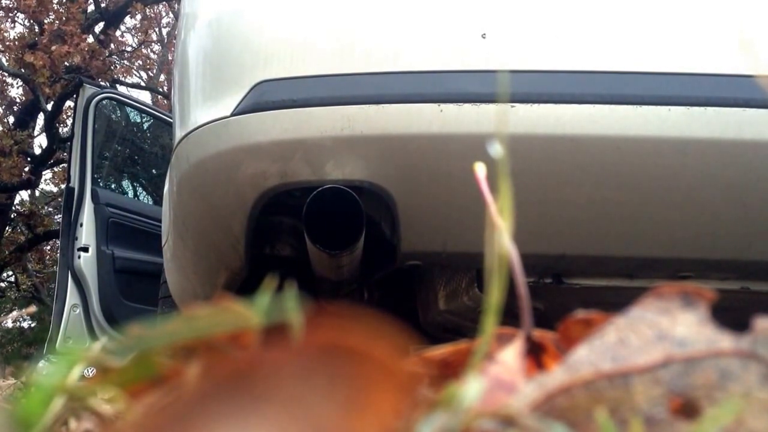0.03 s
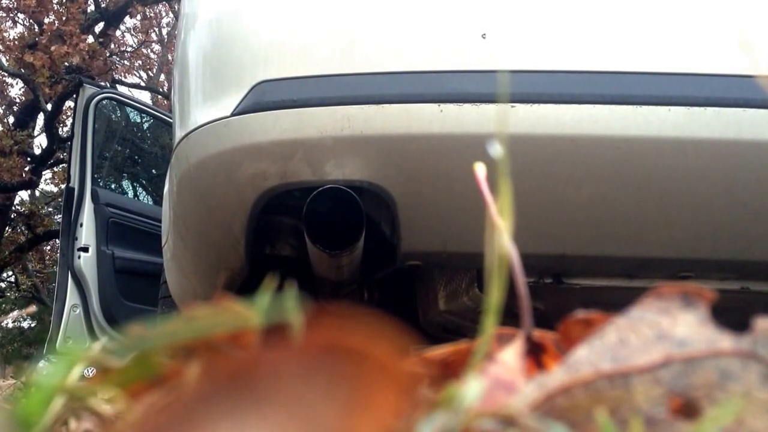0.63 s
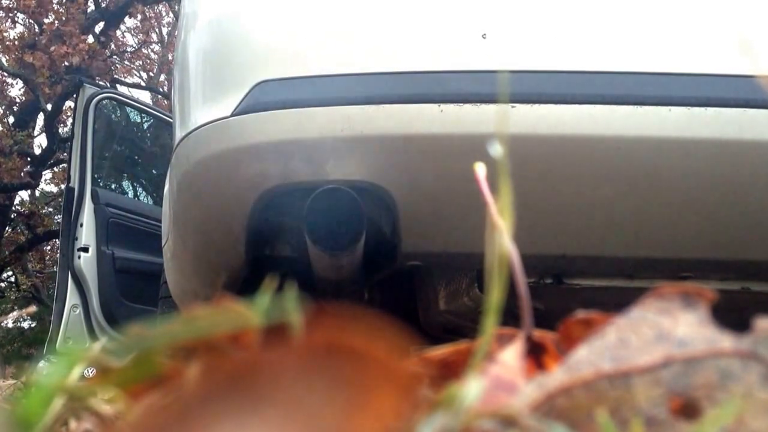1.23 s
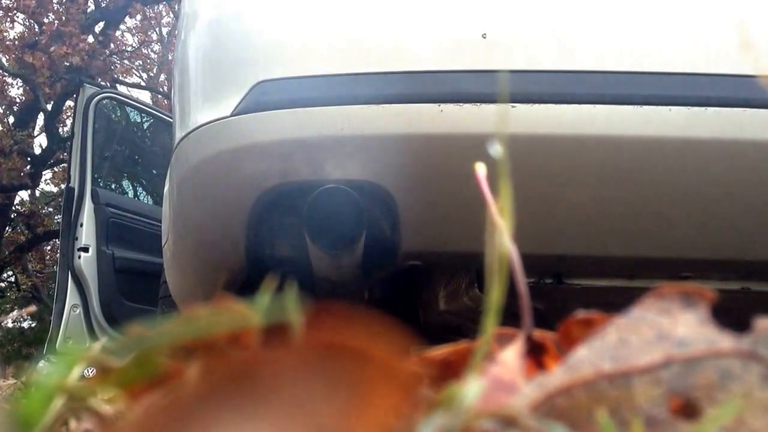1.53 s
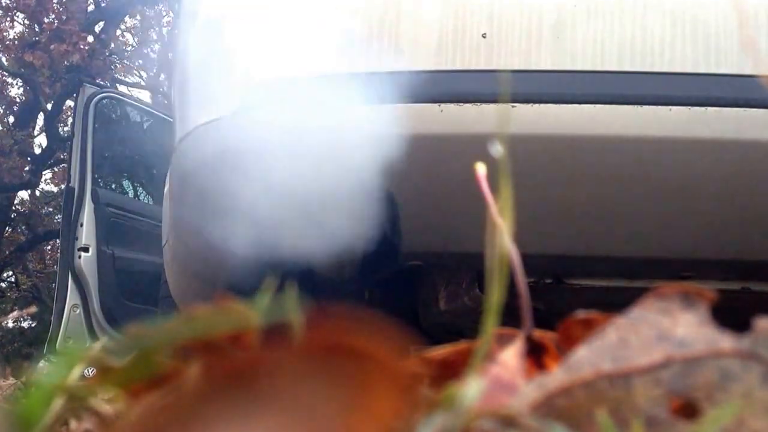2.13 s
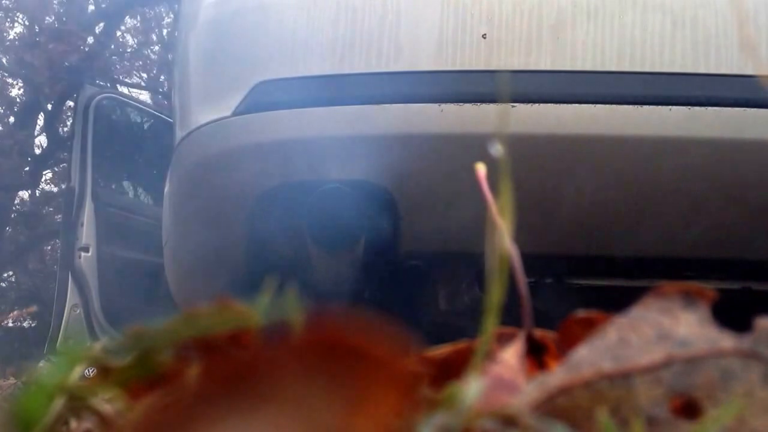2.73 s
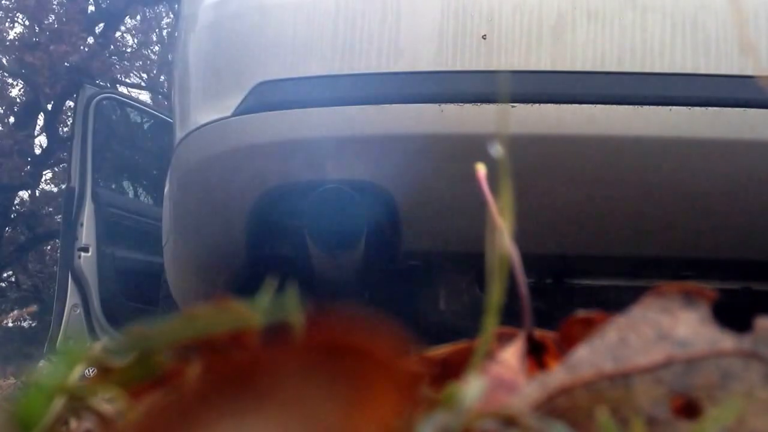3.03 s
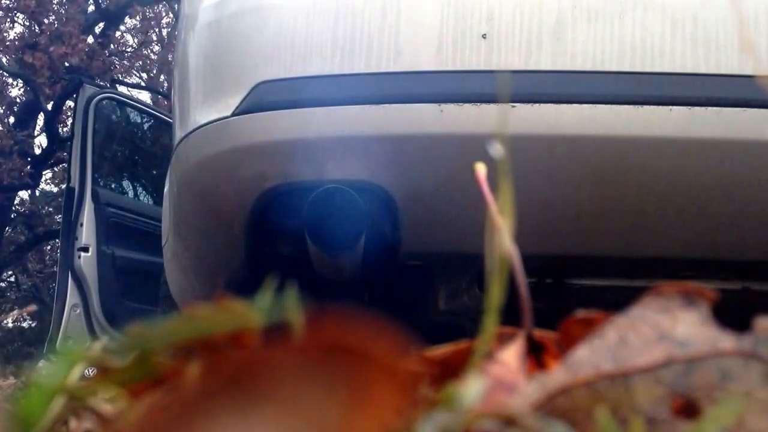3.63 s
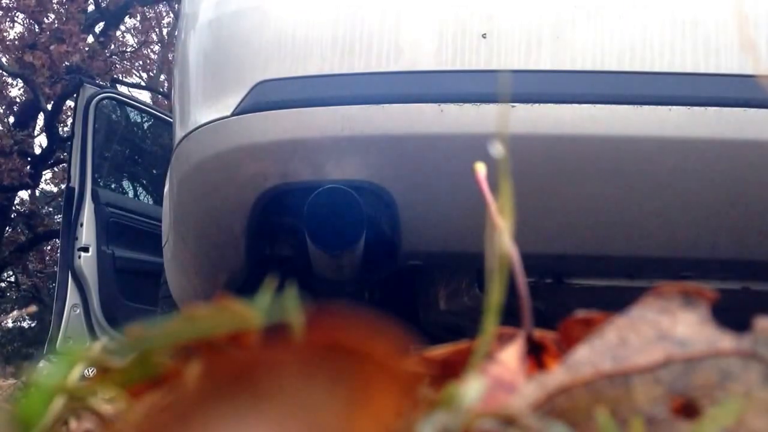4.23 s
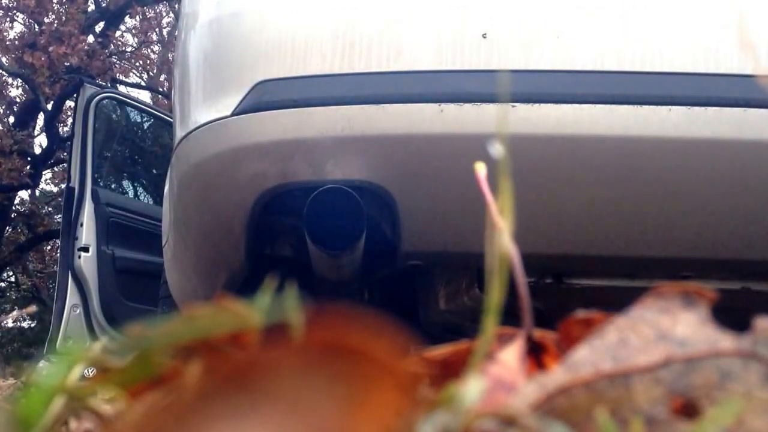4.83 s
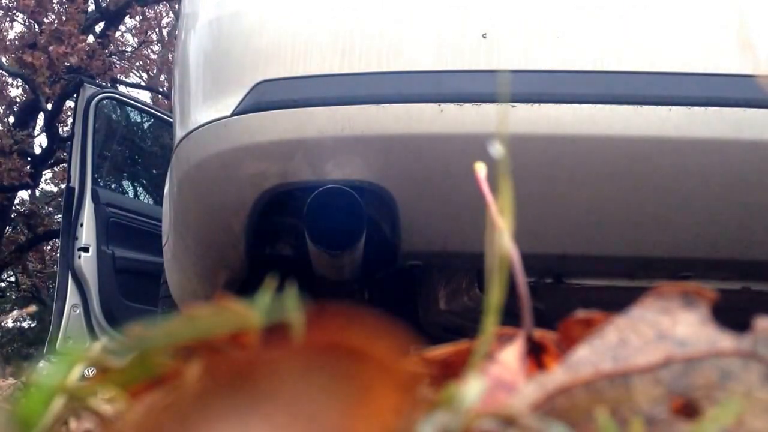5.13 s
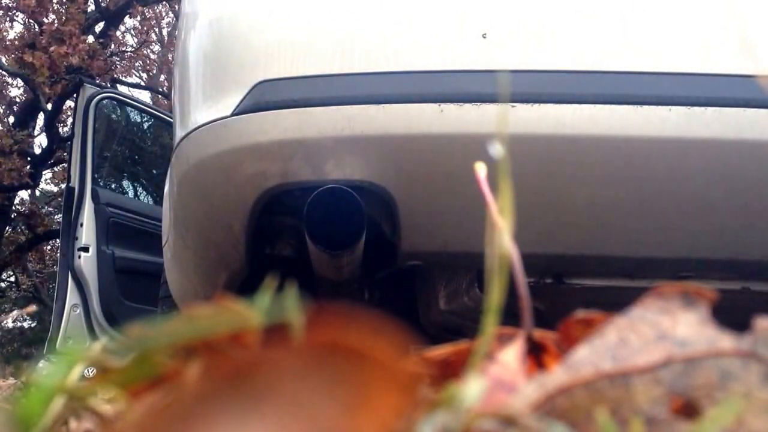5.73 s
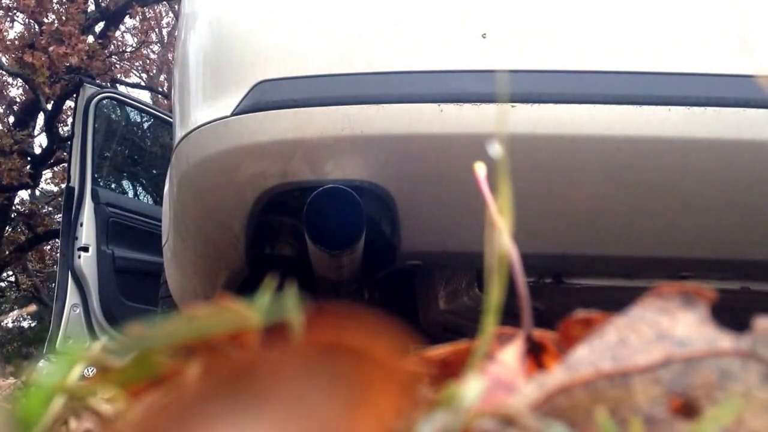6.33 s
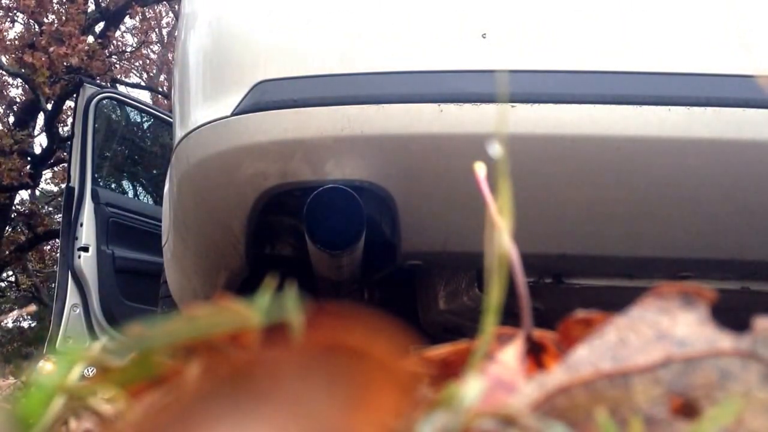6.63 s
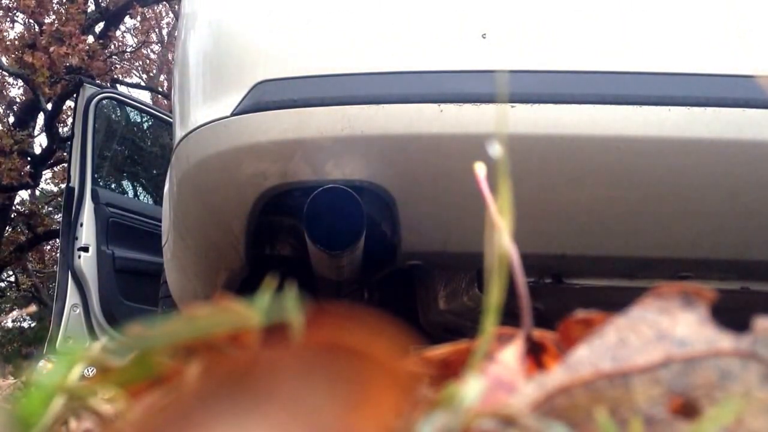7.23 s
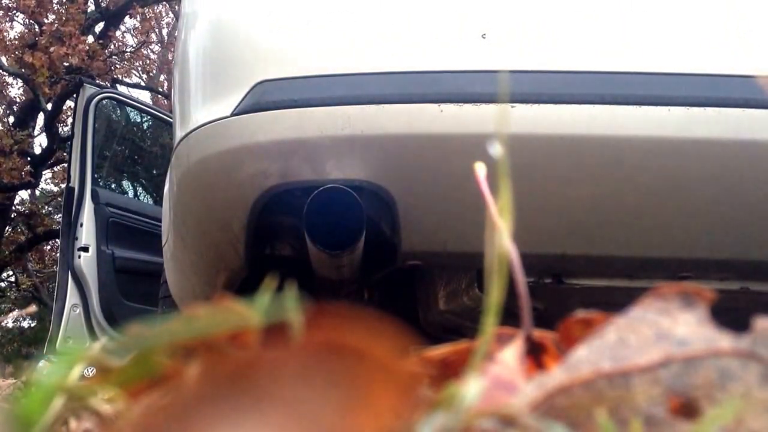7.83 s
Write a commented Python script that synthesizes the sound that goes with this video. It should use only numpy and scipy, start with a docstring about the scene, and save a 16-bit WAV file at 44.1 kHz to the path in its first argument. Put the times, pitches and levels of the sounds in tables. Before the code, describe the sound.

Heard close to the tailpipe, a cold diesel car cranks, fires up and idles roughly, ending with a touch of throttle.

```python
"""First come two soft knocks, then the whine of a starter cranking a cold four-cylinder diesel car.
A few hard firings bark, the engine catches and sinks to a lumpy idle, and a faint turbo whistle creeps in.
At the end the throttle is touched. We listen outdoors, from the ground just behind the tailpipe.
Each firing rings the exhaust, pushes out a gust of swirling gas and hisses at the end of the pipe."""
import sys
import numpy as np
from scipy import signal
from scipy.fft import rfft, irfft
from scipy.io import wavfile
from scipy.ndimage import uniform_filter1d, minimum_filter1d

SR = 44100
rng = np.random.default_rng(int(sys.argv[2]) if len(sys.argv) > 2 else 0)


def to_wav(sig):
    """Store sig (one row per channel, or 1-D mono) as 16-bit WAV at the path in sys.argv[1].

    Samples outside -1..1 are clipped; the rate is SR.
    """
    pcm = np.clip(np.atleast_2d(sig), -1, 1) * 32767
    pcm = np.round(pcm).astype(np.int16)
    wavfile.write(sys.argv[1], SR, pcm.T)  # frames by channels


N = 347508
TIME = np.arange(N) / SR
FREQ = np.fft.rfftfreq(2 ** 19, 1 / SR) + 1e-3
CATCH_S, WARM_UP_S = 1.352, 5.33  # the engine runs by itself; it is mostly warm
THROTTLE_S, REV_RISE_S = 7.695, .12  # the throttle is touched; how long speeding up takes


def undb(db):
    """Turn decibels into a gain to multiply by."""
    return 10 ** (np.asarray(db) / 20)


def unit(x):
    """Scale a sound to an average (rms) size of 1."""
    return x / np.sqrt(np.mean(x ** 2))


def noise():
    """White noise."""
    return rng.standard_normal(N)


def walk(rate_hz):
    """A random wander of about size 1, gliding to a new value rate_hz times a second."""
    step = int(SR / rate_hz)
    levels = np.repeat(rng.standard_normal(N // step + 1), step)[:N]
    return unit(uniform_filter1d(levels, step))


def ramp(t, start, length):
    """0 before the start, rising evenly to 1 over the length."""
    return np.clip((t - start) / length, 0, 1)


def span(start, end, fade):
    """1 between start and end, fading in and out."""
    return np.clip(np.minimum(TIME - start, end - TIME) / fade, 0, 1)


def swells(times, sizes, width):
    """A bell-shaped swell around each time."""
    return sum(size * np.exp(-((TIME - s) / width) ** 2) for s, size in zip(times, sizes))


def pulses(times, sizes):
    """One click at each time."""
    return np.bincount(np.clip(times * SR, 0, N).astype(int), sizes, N + 1)[:N]


def gusts(times, sizes, rise_s):
    """A swell after each time that peaks after rise_s and dies away."""
    age = TIME[:SR // 4] / rise_s
    return signal.fftconvolve(pulses(times, sizes), age * np.exp(1 - age))[:N]


def through(x, response):
    """Filter a sound; the response gives a gain for every frequency."""
    return irfft(rfft(x, 2 * (len(FREQ) - 1)) * response)[:N]


def band(x, low_hz, high_hz, order=3):
    """Keep what lies between two frequencies."""
    sections = signal.butter(order, [low_hz, high_hz], "band", fs=SR, output="sos")
    return signal.sosfilt(sections, x + 1e-18)


def colour(points):
    """A filter that follows (Hz, dB) points and falls away steeply beyond them."""
    hz, db = np.transpose(points)
    octaves_outside = np.abs(np.log2(FREQ / np.clip(FREQ, hz[0], hz[-1])))
    curve_db = np.interp(np.log(FREQ), np.log(hz), db) - 40 * np.minimum(octaves_outside, 1)
    # this folding makes the filter ring only after a sound, never before it
    cepstrum = irfft(np.log(undb(curve_db)))
    cepstrum[1:len(FREQ) - 1] *= 2
    cepstrum[len(FREQ):] = 0
    return np.exp(rfft(cepstrum))


def unit_colour(points):
    """Like colour, but white noise keeps its level."""
    response = colour(points)
    return response / np.sqrt(np.mean(np.abs(response) ** 2))


def modes(table):
    """A filter that rings at each (pitch Hz, width Hz, dB); narrow ones ring longer."""
    return sum(undb(db) / (1 + 1j * (FREQ ** 2 - hz ** 2) / (FREQ * width)) for hz, width, db in table)


# The tone of the open air. Each row: frequency in Hz, relative level in dB.
AIR_TONE = [(18, -60), (30, -32), (163, 7.5), (735, 0.5), (1300, -13), (1970, -7), (2190, -12),
            (2990, -11.5), (3980, -13), (4900, -14), (7430, -11), (8250, -13.5), (15000, -16)]

def outdoor_air(level_db=-59):
    """The quiet, steady rush of the outdoors."""
    return unit(through(noise(), colour(AIR_TONE))) * undb(level_db)


def reflections(car, decay_s=.0097, delay_s=.008, level_db=-14):
    """The car's underside and nearby trees scatter a little sound back."""
    age = TIME[:SR // 2]
    echo = rng.standard_normal(len(age)) * np.exp(-age / decay_s) * (age > delay_s)
    echo /= np.linalg.norm(echo)
    return signal.fftconvolve(band(car, 330, 6000, order=2), echo)[:N] * undb(level_db)


def turbo_whistle(idle_hz=3985, climb_hz_per_s=6600, idle_db=-72, boost_db=20):
    """The turbocharger whistles faintly at idle and climbs as the throttle opens."""
    hz = idle_hz + climb_hz_per_s * np.maximum(TIME - THROTTLE_S, 0)
    phase = 2 * np.pi * np.cumsum(hz * (1 + .034 * walk(900))) / SR
    level_db = idle_db + boost_db * ramp(TIME, THROTTLE_S, REV_RISE_S / 2)
    return np.sin(phase) * ramp(TIME, WARM_UP_S, .61) * undb(level_db)


# Knocks in the car's body and the starter engaging.
# Each row: start in seconds, level in dB, pitch in Hz, width in Hz, decay in seconds.
KNOCKS = [(0.062, -46.5, 177, 50, 0.026), (0.166, -53.5, 500, 890, 0.016), (0.463, -40.5, 510, 455, 0.05),
          (0.485, -35, 245, 226, 0.093)]

def knocks():
    """Short, dull blows die away in the car's body."""
    out = np.zeros(N)
    for start, db, hz, width, decay in KNOCKS:
        body = unit(through(noise(), modes([(hz, width, 0)]) ** 2))
        out += body * undb(db) * (TIME > start) * np.exp(-np.abs(TIME - start) / decay)
    return out


# The tone of the starter's gears. Each row: frequency in Hz, relative level in dB.
GEAR_TONE = [(150, -65), (250, -2.5), (708, 6), (802, -4), (932, 4), (980, -9), (1020, -10), (1170, -10),
             (1390, -2), (1620, -2.5), (1770, -13), (2840, -28), (5000, -26), (6500, -76), (11000, -120)]
# A piston squeezes its air. Each row: time of the tightest squeeze in seconds,
# drop in gear pitch in Hz, relative gear level in dB, level of the pumped air in dB.
COMPRESSIONS = [(0.639, 33, -66, -68), (.75, 79, -49.5, -40.5), (0.901, 85, -46.5, -38),
                (1.068, 27.2, -41.5, -19.5), (1.202, 10, -46, -19.5)]

def starter(engage_s=.462, release_s=1.24, first_hz=120, full_hz=338, spin_up_s=.032):
    """A small gear whines and rattles on the flywheel while the pistons pump air down the exhaust."""
    tops, sag_hz, load_db, pump_db = np.transpose(COMPRESSIONS)
    age = np.maximum(TIME - engage_s, 0)
    # the gears work hardest just before each squeeze and turn slowest at its top
    squeeze_s = .038
    tooth_hz = full_hz + (first_hz - full_hz) * np.exp(-age / spin_up_s)
    tooth_hz -= swells(tops, sag_hz, squeeze_s)
    first_jolt = undb(-41) * np.exp(-age / .05)
    load = undb(-55) + first_jolt + swells(tops - squeeze_s, undb(load_db), squeeze_s)
    phase = 2 * np.pi * np.cumsum(tooth_hz * (1 + .025 * walk(200))) / SR
    teeth = sum(np.sin(k * phase) * undb(-7 if k % 2 else 0) for k in range(1, 7))
    whine = unit(through(teeth, colour(GEAR_TONE)))
    rattle = unit(through(noise() * undb(2.9 * walk(120)), colour(GEAR_TONE)))
    gears = (whine + rattle * undb(-2)) * undb(-2) * load
    breath = through(noise(), modes([(134, 28, 6), (200, 37, 3), (280, 50, -34), (487, 57, -15)]))
    puffs = unit(band(breath, 54, 570)) * gusts(tops - .01, undb(pump_db), rise_s=.024)
    return (gears + puffs) * span(engage_s, release_s, fade=.011)


def starter_squeak(level_db=-62):
    """The starter's drive squeaks as the engine first overtakes it."""
    squeak = through(noise(), modes([(3200, 110, 0), (3680, 240, 1)]))
    return unit(band(squeak, 2600, 4300)) * span(1.02, 1.134, fade=.026) * undb(level_db)


def firing_times(idle_hz=32.35, overshoot_hz=8.24, settle_s=1.77, rev_hz=12.5):
    """One firing per half turn: fast after catching, sinking to idle, faster on the throttle."""
    rate_hz = idle_hz + overshoot_hz * np.exp((CATCH_S - TIME) / settle_s)
    rate_hz += rev_hz * ramp(TIME, THROTTLE_S, REV_RISE_S)
    runs = TIME >= CATCH_S
    count = np.cumsum(rate_hz[runs]) / SR
    return np.interp(np.arange(int(count[-1]) + 1), count, TIME[runs])


def coldness(t):
    """1 while the cylinders are cold, falling to 0 as they warm."""
    return np.exp(-(t / WARM_UP_S) ** 4)


def engine_gain(idle_db, fuel_db, cold_db, throttle_db, fuel_fade_s=.15):
    """A gain over time: warm idle plus what starting fuel, cold and throttle add."""
    fuel = np.exp(-np.maximum(TIME - CATCH_S, 0) / fuel_fade_s)
    throttle = ramp(TIME, THROTTLE_S, REV_RISE_S / 2)
    return undb(idle_db + fuel_db * fuel + cold_db * coldness(TIME) + throttle_db * throttle)


def silencer(top_hz):
    """The silencer rounds each pulse, soaks up one band and delays the tone its chamber rings at."""
    rounding = 1 / (1 + (FREQ / top_hz) ** 6)
    absorbed = 1 - modes([(401, 65, -7.5)])
    chamber = 1 - 2 * modes([(275, 45, 0)])
    return rounding * absorbed * chamber


# Tones that a hard firing rings. Each row: pitch in Hz, width in Hz, relative level in dB.
BARK_TONES = [(125, 23, -0.5), (169, 39, 0), (250, 44, 2), (322, 70, -5.5), (486, 38, 2), (600, 110, -15)]
# The tone of its sharp spit. Each row: frequency in Hz, relative level in dB.
SPIT_TONE = [(2000, -33), (3200, -51), (4000, 0), (4700, 9), (5700, 3), (7000, 14), (9000, 3.5),
             (15000, -19)]
# Hard firings as the engine catches and just after.
# Each row: start in seconds, then relative levels in dB of the pulse, the gas and the spit.
HARD_FIRINGS = [(.942, -9, -15, -46.5), (1.019, -20, -23, -52), (1.072, -2, -13.5, -47),
                (1.189, 6, -10.5, -39.5), (1.2335, 9.5, -7, -36.5), (1.267, 7.5, -11, -44.5),
                (1.297, 4.5, -10, -36), (1.324, 6.5, -14, -44), (1.349, -2, -7.5, -41),
                (1.403, -1, -33, -53), (2.33, -20, -29.5, -62), (2.434, -25, -33.5, -62)]

def hard_firings(rev_pulse_db=-7.5, rev_gas_db=-21, rev_spit_db=-48):
    """A firing with lots of fuel leaves the pipe as a bark, a burst of gas and a sharp spit."""
    # firings under throttle bark too
    revs = [(s - .003, rev_pulse_db - 14 * (1 - ramp(s, THROTTLE_S, REV_RISE_S)), rev_gas_db, rev_spit_db)
            for s in firing_times() if s > THROTTLE_S]
    times, pulse_db, gas_db, spit_db = np.transpose(HARD_FIRINGS + revs)
    kicks = pulses(times, -undb(pulse_db + 28))
    bark = band(through(kicks, modes(BARK_TONES) * silencer(top_hz=700)), 90, 900)
    gas_tone = unit_colour([(30, -36), (90, -36), (140, 15), (300, 1), (580, 6.5), (800, -13),
                            (1150, -17.5), (1650, -17.5), (2100, -34.5), (3000, -49)])
    gas = through(noise() * gusts(times - .0043, undb(gas_db), rise_s=.0049), gas_tone)
    spit = through(noise() * gusts(times - .0015, undb(spit_db), rise_s=.0028), unit_colour(SPIT_TONE))
    return bark + gas + spit


# The tone of the hiss. Each row: frequency in Hz, relative level in dB.
HISS_TONE = [(2200, -20), (3700, -31), (4200, -20), (4600, -5), (4850, -17.5), (5100, -12.5), (5850, -22.5),
             (6250, -5), (6500, -6.5), (6950, 2.5), (7500, -6.5), (9000, -15), (10000, -16), (15000, -31.5)]

def pipe_hiss(times, burn_db, scatter_db=.63, wander_db=.85, full_from_s=1.6):
    """Gas hisses at the end of the pipe, swelling with every firing."""
    gust_db = scatter_db * rng.standard_normal(len(times)) + .24 * burn_db
    jet = .72 + gusts(times - .0055, undb(gust_db), rise_s=.0029)
    hiss = unit(through(noise() * jet, colour(HISS_TONE)))
    fade_in_db = -13 * (1 - ramp(TIME, CATCH_S, full_from_s - CATCH_S))
    hiss *= undb(fade_in_db + wander_db * walk(8))
    return hiss * engine_gain(idle_db=-52.5, fuel_db=0, cold_db=-1, throttle_db=2.5)


# The low and high parts of the roar's tone. Each row: frequency in Hz, relative level in dB.
ROAR_LOW = [(25, -7), (50, 1), (90, 3), (135, 9), (240, 11), (350, 3)]
ROAR_HIGH = [(470, 0.5), (640, -0.5), (780, -8), (930, -8.5), (1150, -14), (1600, -9.5), (1950, -18),
             (2200, -44.5), (3200, -49.5)]
# Tones of the tailpipe and the car's underside. Each row: pitch in Hz, width in Hz, relative level in dB.
TAILPIPE_TONES = [(273.3, 61, 8), (433, 23, 4.5), (517, 11.4, -1), (625, 7, -3), (939, 34, 3.5),
                  (1580, 96, -12.5)]
# The gas each cylinder pushes out, in firing order. Each entry: relative level in dB.
CYLINDER_GAS_DB = [3, 4, 3.5, 3.5]

def gas_roar(times, cylinder, scatter_db=3, rumble_hz=135):
    """Swirling gas roars through the tailpipe, with a gust on every stroke."""
    gust_db = np.array(CYLINDER_GAS_DB)[cylinder] + scatter_db * rng.standard_normal(len(times))
    flow = 1.15 + gusts(times - .011, undb(gust_db), rise_s=.0066)
    roar = through(noise() * flow, colour(ROAR_LOW + ROAR_HIGH) * (1 + modes(TAILPIPE_TONES)))
    roar /= np.std(band(roar, 500, 2000))
    # the gas hardly rumbles until the engine has warmed for a few seconds
    rumble = through(roar, 1 / (1 + (FREQ / rumble_hz) ** 8))
    roar -= .92 * (1 - ramp(TIME, 2, 3.5)) * rumble
    return roar * engine_gain(idle_db=-44.5, fuel_db=4, cold_db=1.2, throttle_db=3)


# Tones of the exhaust pipe and of the manifold, the branches that join the cylinders to it.
# Each row: pitch in Hz, width in Hz, relative level in dB.
PIPE_TONES = [(133.5, 13.8, 34.5), (168.8, 9.3, 29.5), (192, 20, 19), (260, 19, 6), (292.8, 13.7, 16.5),
              (426.7, 14, 20), (615, 71, 7)]
MANIFOLD_TONES = [(205, 18, 28), (243.8, 13.8, 28), (276.4, 12.5, 17.5), (312, 17, 10), (364, 12, 2),
                  (435, 28, 11), (506, 22, 14.5)]

def exhaust_chug(times, pulse_db, surge_delay_s, surge_db, low_cut_hz=124):
    """A pulse rings the pipe; then the piston sweeps out a second surge that rings the manifold."""
    opening = times - .0025
    pipe = through(pulses(opening, -undb(pulse_db)), modes(PIPE_TONES))
    pipe *= engine_gain(idle_db=-2.5, fuel_db=14.5, cold_db=-1.5, throttle_db=-2)
    manifold = through(pulses(opening + surge_delay_s, -undb(surge_db)), modes(MANIFOLD_TONES))
    manifold *= engine_gain(idle_db=-3, fuel_db=7, cold_db=3, throttle_db=10)
    low_cut = 1 / np.sqrt(1 + (low_cut_hz / FREQ) ** 14)  # the deepest tones of the chug are cut away
    return through(pipe + manifold, silencer(top_hz=490) * low_cut)


# The four cylinders in firing order. Each row: relative pulse level in dB, timing shift in seconds,
# delay of the second surge in seconds, relative surge level in dB.
CYLINDERS = [(0.5, -.0016, 0.00669, -3.5), (1.5, -.0017, 0.00577, 2), (1.5, -.0011, 0.007395, .6),
             (-3.5, -.002, .0016, 0.9)]
# Unusually strong or weak firings of the cold engine. Each row: time in seconds, level change in dB.
STUMBLES = [(1.45, -7), (1.55, -11), (2.12, 4.5), (2.31, 4), (2.61, -8), (3.22, 3.5), (3.34, 3.5),
            (3.54, 5), (3.68, 4.5), (3.91, 4.5), (4.06, -6)]

def running_engine(jitter_s=.0001, scatter_db=.5, cold_scatter_db=1.8):
    """Four unequal cylinders fire in turn, raggedly while cold and more evenly as they warm."""
    times = firing_times()
    cylinder = np.arange(len(times)) % len(CYLINDERS)
    pulse_db, shift_s, surge_delay_s, surge_db = np.array(CYLINDERS)[cylinder].T
    cold = coldness(times)
    times = times + shift_s + jitter_s * (1 + cold) * rng.standard_normal(len(times))
    burn_db = (scatter_db + cold_scatter_db * cold) * rng.standard_normal(len(times))
    for when, db in STUMBLES:
        burn_db[np.argmin(np.abs(times - when))] = db
    chug = exhaust_chug(times, pulse_db + burn_db, surge_delay_s, surge_db + burn_db)
    engine = chug + gas_roar(times, cylinder) + pipe_hiss(times, burn_db)
    return engine * ramp(TIME, CATCH_S - .012, .018)


def scene():
    """The car, its reflections and the open air, in one channel."""
    car = running_engine() + hard_firings() + starter() + starter_squeak() + knocks() + turbo_whistle()
    return (car + reflections(car) + outdoor_air())[None]


def record(dry, hold_s=.006, top_hz=15250):
    """A limiter holds the loudest peaks at full scale, and the highest treble is cut."""
    window = int(hold_s * SR) | 1
    needed_gain = 1 / np.maximum(np.abs(dry), 1)
    gain = uniform_filter1d(minimum_filter1d(needed_gain, window), window)
    treble_cut = signal.ellip(10, .2, 80, top_hz, fs=SR, output="sos")
    return signal.sosfilt(treble_cut, dry * gain)


dry = scene()
out = record(dry)
to_wav(out)
```